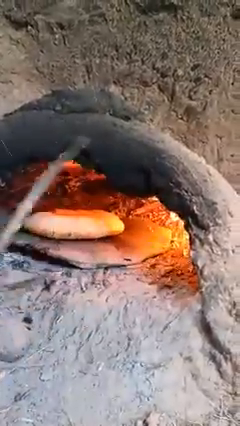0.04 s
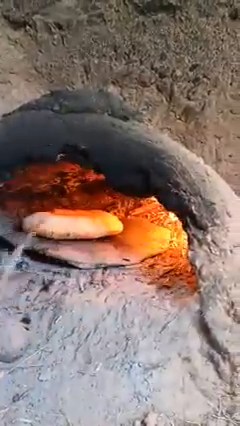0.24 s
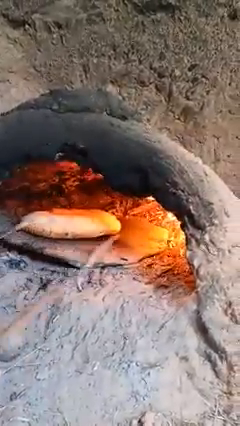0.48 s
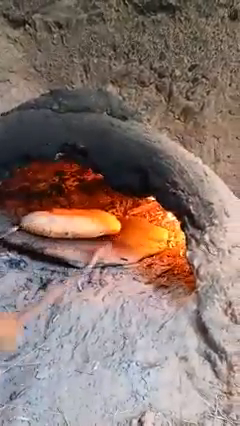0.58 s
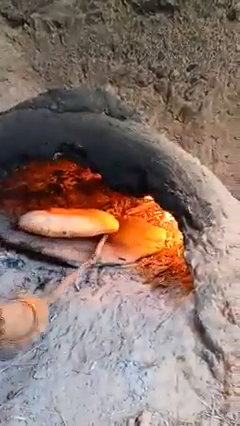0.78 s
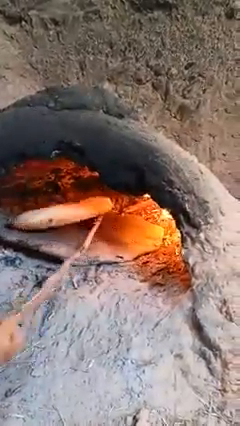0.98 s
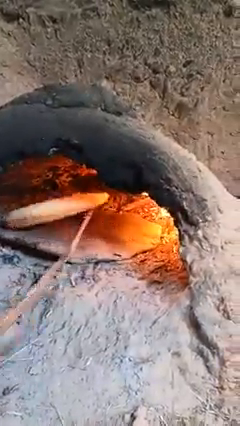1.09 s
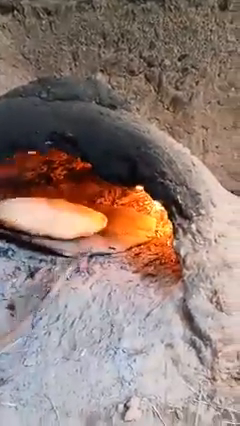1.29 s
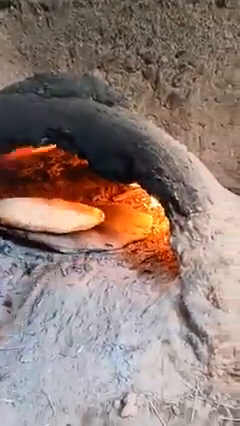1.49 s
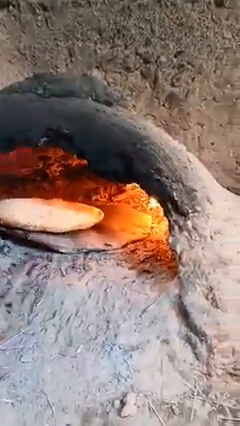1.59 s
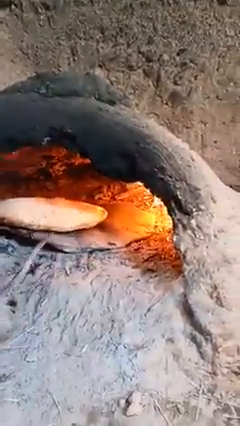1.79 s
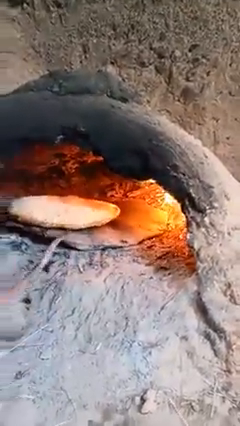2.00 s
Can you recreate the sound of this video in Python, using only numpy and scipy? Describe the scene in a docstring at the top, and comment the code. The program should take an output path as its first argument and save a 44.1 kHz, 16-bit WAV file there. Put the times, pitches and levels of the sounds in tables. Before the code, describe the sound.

A wooden stick knocks and scrapes in a clay oven, heard close. It raps sharply at about 0.2 seconds, lands more softly near 0.7 and scrapes through grit, the wood ringing briefly. Around 1.3 seconds a loaf flops down with a hollow boom and slides, its crust crackling until 1.5. A few faint bumps and taps follow up to 2 seconds, over a faint low rumble.

```python
"""At a clay bread oven: a wooden stick raps the clay, lands on the gritty floor and scrapes in under
a loaf, friction keeping the wood ringing. The loaf tips and flops down: its crust crackles, it slides,
and the oven's hollow booms. The stick is drawn back with a few light taps.
A faint rumble lies beneath; one close microphone."""
import sys
import numpy as np
from scipy import signal
from scipy.fft import rfft, irfft, next_fast_len
from scipy.io import wavfile

SR = 44100
rng = np.random.default_rng(int(sys.argv[2]) if len(sys.argv) > 2 else 0)


def digitize_waveform(pressure):
    """Quantize a signal to 16-bit integers and store it at the path in sys.argv[1].

    Rows of a 2-D input are taken as channels; values are limited to [-1, 1].
    """
    field = np.atleast_2d(pressure).T
    bounded = np.clip(field, -1, 1)
    quanta = np.round(bounded * 32767).astype(np.int16)
    wavfile.write(sys.argv[1], SR, quanta)


N = 90404
T = np.arange(N) / SR
AGE = np.arange(SR // 2) / SR  # s since a blow

# wooden stick's bending modes: f/Hz, struck level/dB, t60/s, rubbed level/dB
STICK_MODES = [(360, -3, 0.33, -11), (700, -6, 0.15, -30), (775, 1, 0.13, -16), (1080, -2, 0.15, -10),
               (1460, -9, .12, -22), (1738, -5, 0.38, 0), (2686, -10, 0.25, -16), (2859, -6, .15, -16),
               (3494, -4, .22, -1.5), (3690, -6, .1, -20), (4883, -7, .1, -20), (5809, -10, .16, -20)]


def amp(db):
    """dB to gain."""
    return 10 ** (np.asarray(db) / 20)


def unit(x):
    """Scale to rms 1."""
    return x / np.sqrt(np.mean(x ** 2) + 1e-20)


def gains(rows):
    """One gain curve per dB column after t/s; zero outside the rows."""
    times, *levels = np.transpose(rows)
    inside = (T >= times[0]) * (T <= times[-1])
    return [amp(np.interp(T, times, db)) * inside for db in levels]


def shaped(x, spectrum):
    """Filter by (f/Hz, gain/dB) points."""
    points_hz, db = np.transpose(spectrum)
    size = next_fast_len(x.shape[-1], real=True)
    hz = np.fft.rfftfreq(size, 1 / SR)
    response = amp(np.interp(np.log(hz + 1), np.log(points_hz + 1), db))
    return irfft(rfft(x, size) * response, size)[..., :x.shape[-1]]


def colour(x, spectrum):
    """Filtered x, rms 1."""
    return unit(shaped(x, spectrum))


def noise(spectrum, size=len(AGE)):
    """Coloured noise, rms 1."""
    return colour(rng.standard_normal(size), spectrum)


def rise(attack_s):
    """Exponential attack."""
    return 1 - np.exp(-AGE / attack_s)


def fade(t60_s):
    """Exponential decay."""
    return np.exp(-np.log(1000) * AGE / t60_s)


def at(s, x):
    """Place x at time s."""
    return np.pad(x, (max(round(s * SR), 0), N))[:N]


def ring(modes):
    """Damped sines of alternating sign from (f/Hz, level/dB, t60/s) rows."""
    return sum((-1) ** k * amp(db) * fade(t60) * np.sin(2 * np.pi * hz * AGE)
               for k, (hz, db, t60) in enumerate(modes))


def bursts(rows, spectrum, attack_s):
    """One noise puff per (t/s, level/dB, t60/s) row."""
    return sum(at(s, amp(db) * rise(attack_s) * fade(t60) * noise(spectrum)) for s, db, t60 in rows)


def wobble(knots_per_s):
    """Piecewise linear random curve."""
    knots = rng.standard_normal(N // 20)
    return np.interp(T * knots_per_s, np.arange(len(knots)), knots)


def grains(per_s, spread_db=0):
    """Tiny random slips of uneven size."""
    slips = (rng.random(N) < per_s / SR) * rng.standard_normal(N)
    return slips * amp(spread_db * rng.standard_normal(N))


def rubbed_mode(hz, width_hz):
    """Narrow noise around a fixed or moving pitch, rms 1."""
    phase = 2 * np.pi * np.cumsum(hz * np.ones(N)) / SR
    return unit(wobble(width_hz) * np.sin(phase) + wobble(width_hz) * np.cos(phase))


def rumble():
    """The hollow drones, louder while its floor is rubbed, over quiet outdoor air."""
    drone_levels = [(0, -59.5), (.62, -59), (.7, -52), (.77, -46), (.85, -57), (.95, -44.5), (1.1, -51),
                    (1.24, -47), (1.3, -31), (1.45, -35), (1.53, -46), (1.62, -45), (1.67, -59),
                    (2.05, -61.5)]  # t/s, level/dB
    drone_spectrum = [(25, -24), (55, -24.5), (80, -2), (120, -0.5), (145, 1), (190, -10), (300, -23.5),
                      (600, -52.5)]  # f/Hz, level/dB
    air_spectrum = [(25, -17.5), (100, -2.5), (220, -10.5), (400, -4), (800, -16), (2000, -25), (4000, -25),
                    (8200, -29.5), (15000, -24.5)]  # f/Hz, level/dB
    drone = amp(np.interp(T, *np.transpose(drone_levels))) * noise(drone_spectrum, N)
    return drone + amp(-67.5) * noise(air_spectrum, N)


def rap():
    """A light touch, then a hard crack of wood on clay that rings briefly; the oven walls answer."""
    touch_thud = (.179, 220, -43, .08)  # t/s, f/Hz, level/dB, t60/s
    blow_modes = [(247, -27.5, 0.026), (716.6, -26, 0.036), (2060, -19.5, 0.02), (2580, -8.5, 0.0085),
                  (2859, -4.5, 0.025), (3430, -4.5, 0.015), (3816, 2.5, 0.011), (4460, -6, .016),
                  (5026, -4, 0.012), (5610, -12, 0.031), (6200, -13, 0.016), (7210, -10, 0.01),
                  (9800, -12, 0.018)]  # f/Hz, level/dB, t60/s
    tail_modes = [(231.8, -13.5, 0.18), (2600, -3, 0.06), (2750, -4, 0.17), (2870, -2, 0.08),
                  (3214, -3, 0.11), (3490, -1, 0.16), (3545, 1, .2), (3695, -2, 0.1), (3870, 0, 0.11),
                  (4554, 1, 0.12), (4885, -3, 0.13), (5780, -9, .15), (7063, -8, .13)]  # thinner, longer ring: f/Hz, level/dB, t60/s
    crack_spectrum = [(200, -25.5), (1200, -2), (3500, -2.5), (7500, 2.5), (10000, -4.5), (12000, -11),
                      (16000, -25)]  # f/Hz, level/dB
    echo_spectrum = [(100, -7), (250, -11), (1100, -22), (2300, -10.5), (2650, -4.5), (3100, -4),
                     (3300, -12.5), (3600, -1.5), (4200, -11), (4600, -2.5), (5300, -8.5), (6500, -14.5),
                     (7200, -13.5), (11000, -25), (16000, -37)]  # f/Hz, level/dB
    rap_s, echo_delay_s = 0.2313, 0.008
    touch = ring([touch_thud[1:]]) + amp(-37) * ring(blow_modes)
    crack = amp(-12.5) * fade(t60_s=0.025) * noise(crack_spectrum)
    blow = amp(-5) * (ring(blow_modes) + crack) * rise(attack_s=0.0007)
    damping = np.exp(-(AGE / 0.1) ** 4)
    tail = amp(-31) * ring(tail_modes) * rise(attack_s=0.0036) * damping
    echo = amp(-26.5) * fade(t60_s=0.16) * noise(echo_spectrum) * rise(attack_s=0.003) * damping
    return at(touch_thud[0], touch) + at(rap_s, blow + tail) + at(rap_s + echo_delay_s, echo)


def clicks():
    """Dry clicks of stick and crust on clay."""
    contacts = [(.1795, -38, 0.025), (.184, -51.5, 0.12), (.9655, -48, 0.015), (1.2704, -19.5, 0.02),
                (1.2795, -27.5, .018), (1.408, -36.5, 0.068), (1.932, -51.5, 0.14), (2.038, -53.5, 0.1)]  # t/s, level/dB, t60/s
    click_spectrum = [(100, -8), (220, 8.5), (500, 4.5), (1300, 4), (2200, -2), (3000, 0.5), (4500, 3),
                      (6500, -1.5), (11000, -2), (15000, -4)]  # f/Hz, level/dB
    return bursts(contacts, click_spectrum, attack_s=0.00039)


def crust():
    """The crust snaps: a bright puff and a short ring per crack."""
    cracks = [(.331, -47, 0.019), (0.3988, -51, 0.043), (1.2911, -17, 0.0053), (1.391, -37.5, 0.066),
              (1.47, -18.5, 0.026), (1.4788, -32.5, 0.084), (1.495, -36, 0.044)]  # t/s, level/dB, t60/s
    puff_spectrum = [(200, -12), (2500, -15), (5000, -7), (6500, -4), (7300, -3), (10500, -2.5), (13000, 2),
                     (15000, 2.5)]  # f/Hz, level/dB
    crust_modes = [(7350, -3, .022), (8350, -5, .014), (14900, -6, .008)]  # f/Hz, level/dB, t60/s
    attack_s = 0.00086
    snap = amp(-7.5) * ring(crust_modes) * rise(attack_s)
    return bursts(cracks, puff_spectrum, attack_s) + sum(at(s, amp(db) * snap) for s, db, _ in cracks)


def squeak():
    """A faint, thin squeak just before the stick lands."""
    chirp = (.6, .03, 3520, -74)  # t/s, half-width/s, f/Hz, level/dB
    peak_s, half_width_s, hz, db = chirp
    return amp(db) * np.exp(-((T - peak_s) / half_width_s) ** 2) * rubbed_mode(hz, width_hz=150)


def landing():
    """The stick lands ringing, its modes unsteady against the grit."""
    impact_spectrum = [(150, -80), (700, 12), (1300, -5), (3700, 4), (7000, -3), (10000, -11.5),
                       (16000, -24)]  # f/Hz, level/dB
    land_s, waver_rad = 0.666, 0.6
    knock = 0
    for hz, db, t60, _ in STICK_MODES:
        waver = waver_rad * wobble(knots_per_s=130)[:len(AGE)]
        knock += amp(db) * fade(t60) * np.sin(2 * np.pi * hz * AGE + waver)
    impact = rise(attack_s=0.00043) * fade(t60_s=0.13) * noise(impact_spectrum)
    return at(land_s, amp(-37) * knock + amp(-34.5) * impact)


def scrape():
    """The stick drags through grit; the same slips give a gritty hiss and a woody rasp."""
    scrape_levels = [(.66, -96, -51), (.672, -71, -64), (.72, -44.5, -43.5), (.775, -48.5, -50),
                     (.85, -51.5, -50.5), (.885, -50, -46), (.92, -56.5, -56), (.96, -72, -55),
                     (1.0, -65, -59.5), (1.025, -52, -54.5), (1.06, -60, -56), (1.095, -48.5, -57.5),
                     (1.15, -61, -56.5), (1.21, -49, -48), (1.245, -53, -51), (1.3, -34.5, -41.5),
                     (1.33, -58, -44), (1.37, -47.5, -47.5), (1.42, -70, -45.5), (1.455, -68, -56.5),
                     (1.52, -57.5, -54), (1.56, -67, -62), (1.63, -71, -65.5), (1.69, -77.5, -74),
                     (1.79, -73.5, -70), (1.86, -80, -78)]  # t/s, hiss level/dB, rasp level/dB
    hiss_spectrum = [(300, -40), (1500, -27), (3700, -5), (6300, -0.5), (8500, 0.5), (10000, -1),
                     (12000, -6.5), (16000, -2)]  # f/Hz, level/dB
    rasp_spectrum = [(100, 3.5), (250, 4), (450, 3), (700, 0), (1100, -2.5), (1400, -4.5), (2000, -5.5),
                     (2500, -10.5), (4000, -9.5), (8000, -36.5)]  # f/Hz, level/dB
    hiss, rasp = gains(scrape_levels)
    slips = grains(per_s=7000, spread_db=0.5)
    return hiss * colour(slips, hiss_spectrum) + rasp * colour(slips, rasp_spectrum)


def singing():
    """Friction keeps the stick's modes ringing; they rise as the contact point moves along it."""
    push = [(.66, -85, 1.0), (.715, -56, 1.0), (.745, -58, 1.03), (.765, -55.5, 1.07), (.81, -53.5, 1.1),
            (.85, -54, 1.125), (.885, -52, 1.14), (.91, -60, 1.17), (.98, -82, 1.18)]  # t/s, level/dB, pitch ratio to the landing
    times, levels_db, ratios = np.transpose(push)
    glide = np.interp(T, times, ratios)
    voice = sum(amp(db) * rubbed_mode(hz * glide, width_hz=230) for hz, _, _, db in STICK_MODES)
    envelope, = gains(np.transpose([times, levels_db]))
    return envelope * unit(voice)


def loaf():
    """The loaf flops and judders over the clay; blows and rubbing ring the oven's hollow."""
    flops = [(1.257, -32.5, 0.055, -31.5), (1.2768, -22, 0.08, -23), (1.33, -29, 0.069, -49),
             (1.408, -28, 0.063, -34.5), (1.445, -31.5, 0.023, -60), (1.511, -33.5, 0.034, -38),
             (1.61, -46.5, 0.052, -59)]  # t/s, boom level/dB, slap t60/s, slap level/dB
    hollow_modes = [(81.8, -5, 0.4), (114.8, 11, 0.078), (140, 1.5, 0.23), (332.6, -9, 0.13),
                    (396.6, -11.5, 0.056), (733, -23, 0.13), (826.5, -24, 0.25), (1004, -21.5, 0.11),
                    (1138, -27.5, 0.23), (1211, -15, 0.12), (1373, -27.5, 0.25), (1744, -25.5, 0.22),
                    (2130, -23, 0.15), (2533, -15, 0.038)]  # f/Hz, level/dB, t60/s
    loaf_spectrum = [(100, -5.5), (270, 0), (370, 11), (600, -8), (790, 3), (900, -10), (1080, -2),
                     (1700, -8), (2300, -13), (3100, -12), (5200, -15), (9000, -27), (16000, -41.5)]  # slap and rub: f/Hz, level/dB
    slide_levels = [(1.24, -79), (1.26, -44.5), (1.285, -42), (1.32, -43.5), (1.357, -36.5), (1.39, -46),
                    (1.412, -58), (1.45, -62), (1.5, -58.5), (1.52, -48), (1.55, -68), (1.64, -66)]  # t/s, level/dB
    coupling = [(140, -32), (330, -9), (700, -2), (1100, 0), (2600, 0), (5000, -12)]  # sliding crust to hollow: f/Hz, gain/dB
    judder_db, ring_share = 3, 0.35
    hollow = ring(hollow_modes)
    boom = hollow * rise(attack_s=0.0094)
    blows = sum(at(s, amp(boom_db) * boom + amp(slap_db) * fade(t60) * noise(loaf_spectrum))
                for s, boom_db, t60, slap_db in flops)
    slide, = gains(slide_levels)
    slips = grains(per_s=5100) * amp(judder_db * wobble(knots_per_s=160))
    stirred = colour(signal.fftconvolve(slips, hollow)[:N], coupling)
    rub = np.sqrt(1 - ring_share) * colour(slips, loaf_spectrum) + np.sqrt(ring_share) * stirred
    return blows + slide * rub


def bumps():
    """Faint hollow bumps, each a short tone and a dull puff."""
    knocks = [(1.628, -52, 673), (1.727, -49, 580), (1.739, -53, 717), (1.79, -51.5, 697),
              (1.7975, -41.5, 630)]  # t/s, level/dB, f/Hz
    puff_spectrum = [(150, -25), (450, -4), (620, 0), (900, -10), (1500, -28), (4000, -52)]  # f/Hz, level/dB
    envelope = fade(t60_s=0.045) * rise(attack_s=0.0015)
    return sum(at(s, amp(db) * envelope * (np.sin(2 * np.pi * hz * AGE) + 0.81 * noise(puff_spectrum)))
               for s, db, hz in knocks)


def scene():
    """All sources, alike in both channels."""
    stick = rap() + landing() + scrape() + singing() + squeak()
    return np.tile(stick + loaf() + crust() + clicks() + bumps() + rumble(), (2, 1))


def record(dry):
    """The microphone colours the treble, thins the deep bass, clips at full scale and limits the band."""
    mic_response = [(6500, 0), (7900, 5), (9000, 0), (10200, -4.5), (10800, -7), (12600, -2.5),
                    (14300, -0.5)]  # f/Hz, gain/dB
    low_cut_hz, top_hz = 46, 15900
    highpass = signal.butter(2, low_cut_hz, "highpass", fs=SR, output="sos")
    thinned = signal.sosfilt(highpass, shaped(dry, mic_response))
    size = next_fast_len(N + SR // 10, real=True)
    lowpass = 1 / np.sqrt(1 + (np.fft.rfftfreq(size, 1 / SR) / top_hz) ** 200)
    return irfft(rfft(np.clip(thinned, -1, 1), size) * lowpass, size)[:, :N]


dry = scene()
out = record(dry)
digitize_waveform(out)
```